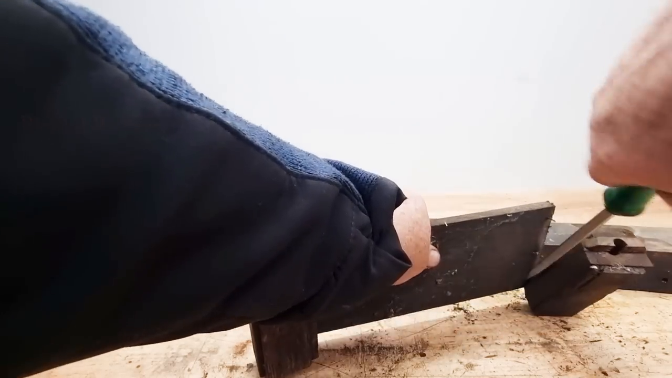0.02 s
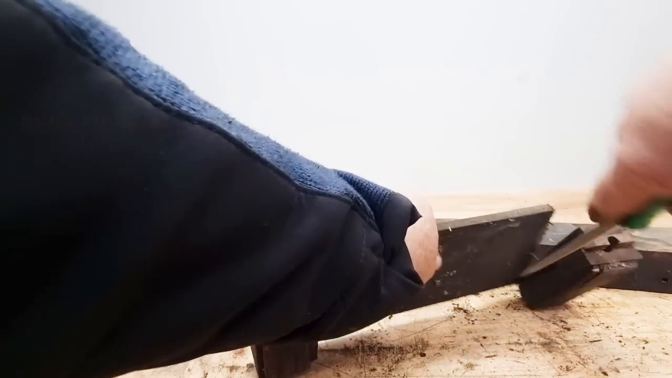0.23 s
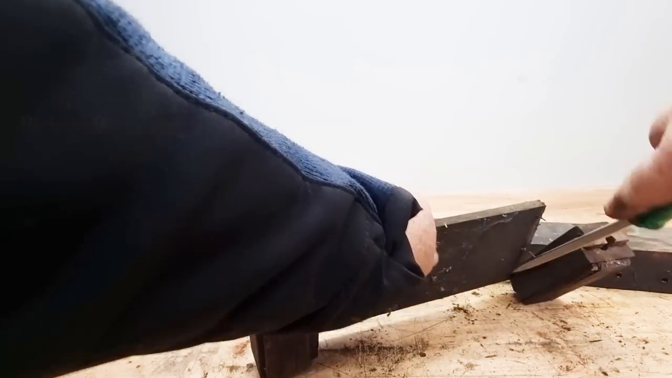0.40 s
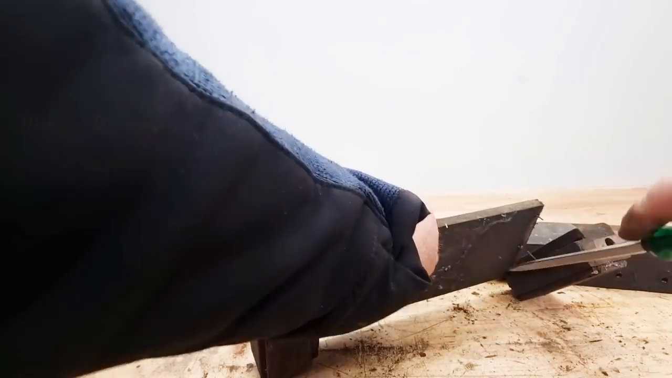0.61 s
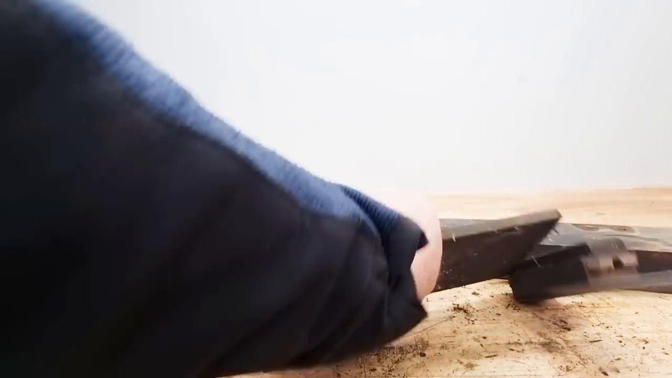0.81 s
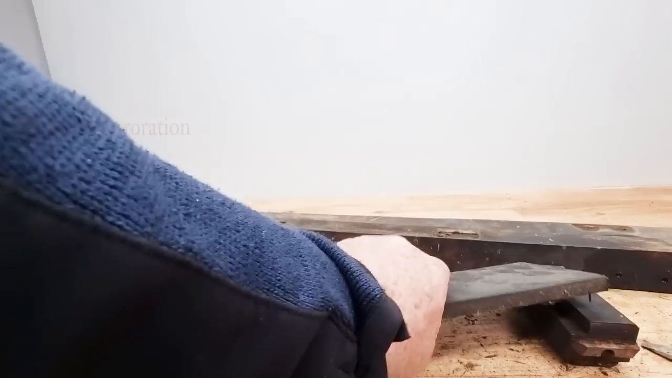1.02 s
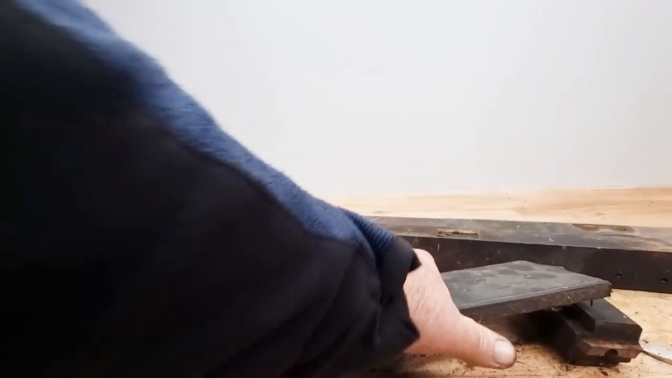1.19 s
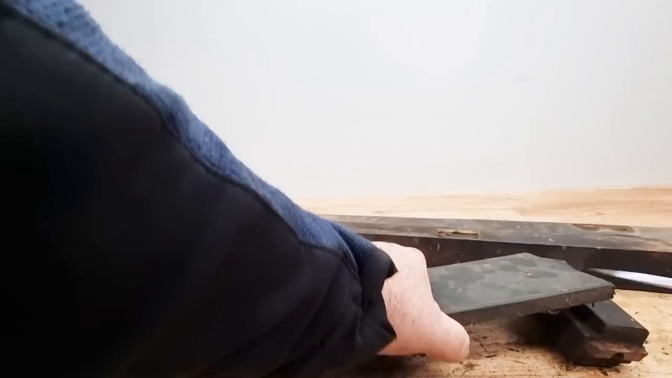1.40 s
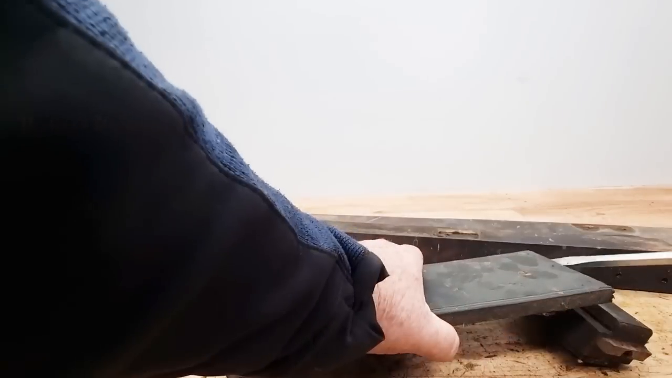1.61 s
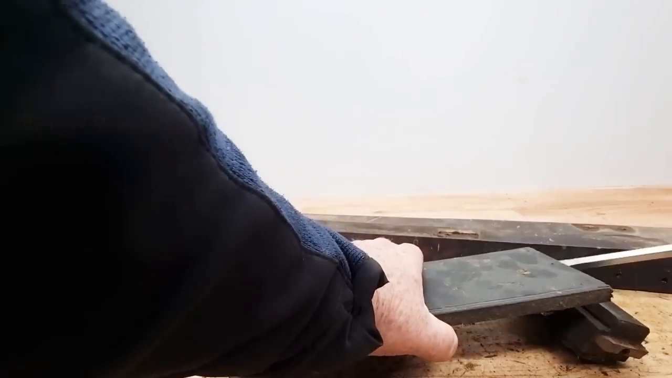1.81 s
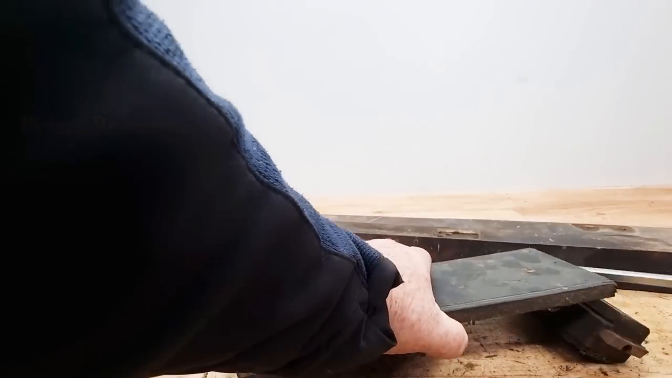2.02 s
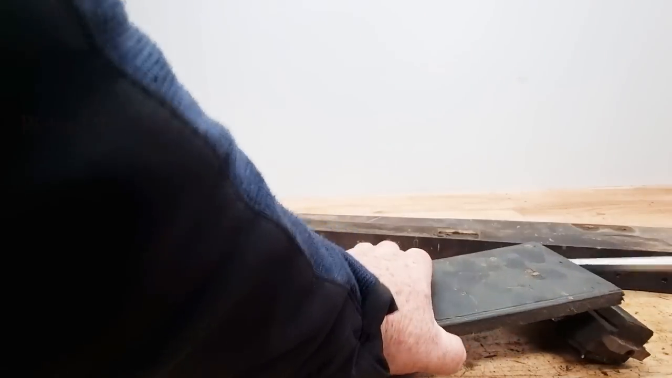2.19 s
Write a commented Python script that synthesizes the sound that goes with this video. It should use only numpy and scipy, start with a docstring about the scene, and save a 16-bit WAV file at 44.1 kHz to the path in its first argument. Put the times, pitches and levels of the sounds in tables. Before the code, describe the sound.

Dry wood knocks and thuds on a bench, with small prying cracks, brief scrapes and light ticks

```python
"""A faint hum and soft room noise come first, then small cracks as a screwdriver prises an old painted
joint apart on a workbench. Cracks are runs of tiny clicks, and sliding is a bed of fine, coloured grains.
Knocking blocks, bench thuds and shaft ticks are sums of fading tones; a brief squeak is a few pure tones.
A small hard workshop answers with an echo tail made of fading noise."""
import sys
import numpy as np
from scipy import signal
from scipy.fft import rfft, irfft, next_fast_len
from scipy.io import wavfile

SR = 44100
rng = np.random.default_rng(int(sys.argv[2]) if len(sys.argv) > 2 else 0)


def store_wav(level_fs):
    """Save 16-bit WAV to argv[1]."""
    pcm = np.round(np.clip(np.atleast_2d(level_fs), -1, 1) * 32767)
    wavfile.write(sys.argv[1], SR, pcm.T.astype(np.int16))


def volts_from_db(level):
    """Convert decibel levels to linear amplitude ratios."""
    exponent = np.asarray(level, float) / 20
    return 10 ** exponent


N = 97020  # samples, 2.2 s

# room noise as heard at the end of the whole chain, nearly empty at the very top:
# pitch_hz, relative_level_db
AIR_AS_HEARD = [(12, -58), (20, -24.5), (97, -6), (123, -10.5), (199, -2), (221, -11), (387, -14),
                (492, -6), (548, -14.5), (1190, -13), (1730, -20.5), (2510, -23.5), (2790, -29),
                (3950, -42), (11800, -49), (15300, -75), (22000, -120)]
# loudness of the room noise over time, before the lift below: time_s, level_db
AIR_LOUDNESS = [(0.0, -60), (0.59, -62), (0.76, -60.5), (1.09, -58), (1.28, -61.5), (2.2, -63.5)]
# how alike the room noise is at left and right: pitch_hz, likeness (1 same, 0 unrelated, -1 opposite)
AIR_LIKENESS = [(60, 1.0), (180, 1.0), (550, 0.99), (1650, 0.99), (4970, 0.55), (15000, -0.62)]
AIR_LIFT_DB = 3.5
HUM_HZ, HUM_WIDTH_HZ, HUM_DB = 95, 7, -66

# time for the workshop's echo tail to fade by 60 dB: pitch_hz, fade_s
ROOM_FADE = [(150, 0.14), (500, 0.34), (1500, 0.2), (4000, 0.32), (9000, 0.31), (15000, 0.12)]
# how alike the tail is at left and right: pitch_hz, likeness
ROOM_LIKENESS = [(300, 0.96), (800, 0.83), (2000, 1), (5000, 0.2), (12000, 0.13)]
# level of each source sent to the room
CRACK_WET_DB, BENCH_WET_DB, BLOCK_WET_DB, SLIDE_WET_DB, TICK_WET_DB = -2.5, -4, -4, -4, -11
LOW_CUT_HZ = 130

# strokes of wood and tip sliding, one list per stroke: time_s, pressure_db
SLIDE_STROKES = [
    [(0.46, -86), (0.488, -63.5), (0.502, -67), (0.526, -65), (0.54, -62.5), (0.556, -89), (0.62, -95)],
    [(0.72, -84), (0.772, -79), (0.798, -69), (0.814, -73), (0.828, -59.5), (0.896, -73.5), (0.904, -64.5),
     (0.962, -70), (0.972, -82), (1.024, -77), (1.1, -73)],
    [(1.24, -71), (1.274, -72.5), (1.298, -74), (1.388, -76), (1.42, -100), (1.46, -69.5), (1.52, -81)],
]
# colour of the sliding grains: pitch_hz, relative_level_db
SLIDE_COLOUR = [(880, -36), (1500, -11), (2300, -7.5), (2720, -10), (3150, -15), (3450, -13), (5880, -19.5),
                (7320, -19), (8570, -24), (13800, -28), (16000, -35)]
GRAINS_PER_S, GRAIN_SPREAD_DB = 6000, 2.5

# tones of the squeak as the tip slips in the joint: pitch_hz, level_db
SQUEAK_TONES = [(2600, -47.5), (3750, -56.5), (5300, -65)]
SQUEAK_START_S, SQUEAK_LENGTH_S = 0.537, 0.0098

# the shaft ticking on wood: start_s, peak_db, favoured_pitch_hz, width_octaves, chatter_fade_s
SHAFT_TICKS = [(0.698, -40, 2220, 0.32, 0.0098), (1.461, -52, 3700, 0.75, 0.0073),
               (1.704, -69, 4350, 0.065, 0.0082), (1.7357, -46, 2870, 0.99, 0.0031),
               (1.7399, -42.5, 2730, 1, 0.0022)]
# tones of the steel shaft, fade times capped below: pitch_hz, relative_level_db, fade_by_60_db_s
STEEL_TONES = [(2100, 4, 0.033), (2283, 7.5, 0.073), (2573, 7, 0.026), (3735, -6, 0.033),
               (4350, -1.5, 0.025), (4890, -11.5, 0.028), (7040, -11, 0.071)]
LONGEST_STEEL_FADE_S, TICK_CONTACT_S = 0.032, 0.0013

# soft thuds into the bench top: start_s, peak_db, tilt_db_per_octave (above 240 Hz), contact_s,
# share_of_free_fade (how much of the free ringing time is left under the hands)
BENCH_THUDS = [(0.239, -32, 5.5, 0.0055, 0.81), (0.264, -31, 5, 0.0039, 0.39),
               (0.289, -44, 21, 0.0065, 0.78), (0.471, -40, -10, 0.0054, 0.17),
               (0.482, -33, -23, 0.014, 0.1), (0.51, -39.5, 15, 0.0061, 0.58),
               (0.522, -36.5, 2, 0.006, 0.36), (0.537, -29.5, -1, 0.0041, 0.2),
               (0.66, -39, -5, 0.0038, 0.51), (0.691, -36, 1.5, 0.0038, 0.49), (0.7, -43.5, 5.5, 0.0015, 1),
               (0.784, -42.5, 14, 0.01, 0.36), (0.802, -37, 12, 0.0099, 0.36),
               (0.824, -35, -11.5, 0.0057, 0.87), (0.836, -36, -8, 0.0053, 1),
               (0.866, -37.5, 10, 0.0032, 0.35), (0.905, -26, 5, 0.0036, 0.58),
               (0.915, -32, -1, 0.017, 0.48), (0.946, -31, 2, 0.004, 0.75),
               (0.969, -27, 11.5, 0.0092, 0.53), (0.983, -30.5, -4, 0.017, 0.46),
               (0.999, -38.5, 11, 0.0032, 1), (1.127, -32.5, 9.5, 0.0018, 0.71),
               (1.132, -33.5, 13.5, 0.0013, 1), (1.143, -35.5, 2, 0.0051, 0.92),
               (1.205, -39, 0, 0.015, 0.6), (1.213, -40, 15.5, 0.0045, 0.67), (1.358, -47, 8, 0.01, 0.13),
               (1.455, -47, 8, 0.0099, 0.43), (1.661, -52, 2, 0.0036, 0.25),
               (1.667, -44.5, -14, 0.0063, 0.38), (1.703, -52.5, 18, 0.0075, 0.26),
               (1.717, -44.5, -7, 0.0066, 0.47), (1.743, -48, 3, 0.0029, 0.34),
               (1.759, -45, -6, 0.0063, 0.41), (2.078, -50, -9, 0.0087, 0.76)]
# tones of the bench top ringing freely: pitch_hz, relative_level_db, fade_by_60_db_s
BENCH_TONES = [(193.2, 2.5, 0.2), (228.8, 6, 0.2), (247.8, 0.5, 0.29), (346.1, 1, 0.21),
               (417.4, -5.5, 0.42), (446.4, -0.5, 0.14), (514.4, -2, 0.09), (736, -10, 0.057)]

# loose blocks knocking: start_s, peak_db, favoured_pitch_hz, width_octaves
BLOCK_KNOCKS = [(0.233, -38.5, 1940, 0.76), (0.536, -42.5, 890, 0.92), (.698, -36.5, 1510, 0.95),
                (.9, -23.5, 1467, 0.18), (0.911, -37, 1560, 0.56), (.94, -24, 1414, 0.32),
                (.968, -28.5, 1220, 0.068), (.973, -31.5, 854, 1), (.991, -31.5, 1450, 0.25),
                (1.016, -39, 1290, 0.28), (1.128, -32, 1080, 0.34), (1.195, -27.5, 1436, 0.32),
                (1.209, -35, 1465, 0.3), (1.218, -37.5, 1180, 0.22), (1.45, -45.5, 1534, 0.29)]
# tones of the wooden blocks, fade times capped below: pitch_hz, relative_level_db, fade_by_60_db_s
BLOCK_TONES = [(845, 3, 0.059), (1087, 6, 0.02), (1197, 4.5, 0.024), (1292, 6, 0.018), (1359, 1.5, 0.023),
               (1454, -4, 0.025), (1565, -2.5, 0.025), (1585, -7, 0.017), (1837, 5.5, 0.012),
               (2217, 8.5, 0.011)]
LONGEST_BLOCK_FADE_S, KNOCK_CONTACT_S = 0.035, 0.0024

# paint and wood fibres cracking: start_s, level_db (before scaling), fade_s (to about a third),
# favoured_pitch_hz, width_octaves
FIBRE_CRACKS = [(0.062, -37.5, 0.006, 7000, 1.34), (0.067, -45, 0.0093, 7000, 0.63),
                (0.2317, -39, 0.035, 7050, 3.7), (.232, -35, 0.038, 1370, 1.23),
                (0.699, -41, 0.0045, 2400, 0.89), (0.824, -56, 0.039, 7020, 0.16),
                (0.9, -39, 0.0092, 2600, 0.67), (0.936, -48.5, 0.031, 2630, 0.28),
                (0.971, -50.5, 0.0089, 3880, 1.14), (0.987, -44.5, 0.0095, 2660, 0.35),
                (1.127, -55.5, 0.01, 2930, 0.76), (1.21, -59.5, 0.0097, 3200, 0.34),
                (1.272, -68, 0.009, 4830, 0.25), (1.449, -55.5, 0.028, 2200, 0.52),
                (1.654, -65, 0.014, 3340, 0.57), (1.738, -58.5, 0.0094, 5700, 0.89)]
SNAPS_PER_S, SNAP_SPREAD_DB = 3500, 3.5
FIRST_SNAP = 1.9  # size of the opening snap over the rms of the run

# level difference between the two ports: pitch_hz, left_minus_right_db
PORT_LEVELS = [(400, 0), (1000, -.2), (1650, -1.5), (3000, -4.5), (5000, -8), (15000, -9)]
# phase by which left leads, before it is eased off in the low end: pitch_hz, lead_radians
PORT_LEAD = [(2500, 1.1), (5000, 0.72), (9000, 1.03), (14000, 2)]
PORTS_HZ = 1500  # well below this the ports are nearly in phase


def unit(x):
    """Scale a sound to an rms of 1."""
    return x / np.sqrt(np.mean(x ** 2) + 1e-20)


def along(points, hz):
    """Read a value between (pitch, value) points on a log pitch axis."""
    point_hz, value = np.transpose(points)
    return np.interp(np.log(hz + 1), np.log(point_hz + 1), value)


def filtered(x, response):
    """Shape a sound by a response that depends on frequency."""
    length = next_fast_len(N + 8192)
    spectrum = rfft(x, length) * response(np.fft.rfftfreq(length, 1 / SR))
    return irfft(spectrum, length)[..., :N]


def spread(pair, likeness):
    """Blend two unrelated signals into a left and right of a given likeness."""
    def shares(hz):
        angle = np.arccos(np.clip(along(likeness, hz), -1, 1)) / 2
        return np.sqrt(2) * np.array([np.cos(angle), np.sin(angle)])

    mid, side = filtered(pair, shares)
    return np.array([mid + side, mid - side]) / np.sqrt(2)


def add(track, start_s, sound):
    """Mix a sound into a track at its start time."""
    part = track[round(start_s * SR):][:len(sound)]
    part += sound[:len(part)]


def focus(hz, centre_hz, octaves):
    """Favour tones near the struck place's pitch: 6 dB down at the given width in octaves."""
    return -6 * (np.log2(hz / centre_hz) / octaves) ** 2


def ring(hz, level_db, fade_s, contact_s, scatter_db):
    """A struck object as fading tones under a soft start; longer contact starts softer. Peak 1."""
    t = np.arange(SR // 3)[:, None] / SR
    uneven_db = level_db + scatter_db * rng.standard_normal(len(hz))
    tones = volts_from_db(uneven_db - 60 * t / fade_s) * np.sin(2 * np.pi * hz * t)
    soft_start = np.sin(np.pi / 2 * np.minimum(t[:, 0] / contact_s, 1)) ** 2
    x = tones.sum(1) * soft_start
    return x / np.abs(x).max()


def grains(per_s, spread_db):
    """Sparse clicks of random sign and uneven size, rms 1."""
    chance, sign, size = rng.random((3, N))
    clicks = (chance < per_s / SR) * np.sign(sign - 0.5)
    return unit(clicks * volts_from_db(-spread_db * np.log(size + 0.0014)))


def air():
    """Room noise is shaped random noise; the wavering hum is a narrow band of low noise."""
    time_s, level_db = np.transpose(AIR_LOUDNESS)
    shaped = filtered(rng.standard_normal((2, N)), lambda hz: volts_from_db(along(AIR_AS_HEARD, hz)))
    noise = unit(spread(shaped, AIR_LIKENESS))
    loudness = volts_from_db(np.interp(np.arange(N) / SR, time_s, level_db) + AIR_LIFT_DB)
    hum = filtered(rng.standard_normal(N), lambda hz: np.exp(-((hz - HUM_HZ) / HUM_WIDTH_HZ) ** 2))
    return noise * loudness + volts_from_db(HUM_DB) * unit(hum)


def room(x):
    """The walls' tail is fading noise, drawn anew for every short, cross-faded stretch."""
    out, step, delay = np.zeros((2, N)), 2205, 180  # samples: 50 ms and 4 ms
    fade = np.sin(np.pi * np.arange(2 * step) / (2 * step)) ** 2
    for k in range(0, N, step):
        hz, t, noise = signal.stft(rng.standard_normal((2, SR // 2)), SR, nperseg=256)
        fading = noise * volts_from_db(-60 * t / along(ROOM_FADE, hz)[:, None])
        tail = signal.istft(fading, SR, nperseg=256)[1]
        tail = tail / np.linalg.norm(tail[0])
        piece = x[k:k + 2 * step]
        piece = piece * fade[:len(piece)]
        echo = signal.fftconvolve(piece[None], tail, axes=1)
        part = out[:, k + delay:][:, :echo.shape[1]]
        part += echo[:, :part.shape[1]]
    return spread(out, ROOM_LIKENESS)


def slide():
    """Fine grains of flaking paint under the moving pieces, louder with pressure."""
    clicks = grains(GRAINS_PER_S, GRAIN_SPREAD_DB)
    rasp = unit(filtered(clicks, lambda hz: volts_from_db(along(SLIDE_COLOUR, hz))))
    t, pressure = np.arange(N) / SR, np.zeros(N)
    for stroke in SLIDE_STROKES:
        time_s, level_db = np.transpose(stroke)
        pressure += volts_from_db(np.interp(t, time_s, level_db, -140, -140))
    return rasp * pressure


def squeak():
    """The tip slips in the joint and squeaks: a few pure tones under one short swell."""
    out, (hz, level_db) = np.zeros(N), np.transpose(SQUEAK_TONES)
    t = np.arange(round(SQUEAK_LENGTH_S * SR))[:, None] / SR
    swell = np.sin(np.pi * t / SQUEAK_LENGTH_S)
    tones = volts_from_db(level_db) * np.sin(2 * np.pi * hz * t)
    add(out, SQUEAK_START_S, (tones * swell).sum(1))
    return out


def ticks():
    """The held shaft chatters briefly on the wood, and each contact rings its steel tones."""
    out, (hz, level_db, fade_s) = np.zeros(N), np.transpose(STEEL_TONES)
    t = np.arange(SR // 30) / SR
    fade_s = np.minimum(fade_s, LONGEST_STEEL_FADE_S)
    for start_s, peak_db, centre_hz, octaves, chatter_s in SHAFT_TICKS:
        # one clean hit, then weaker random contacts dying away
        chatter = (t == 0) + 0.16 * rng.standard_normal(len(t)) * np.exp(-t / chatter_s)
        tones_db = level_db + focus(hz, centre_hz, octaves)
        x = signal.fftconvolve(chatter, ring(hz, tones_db, fade_s, TICK_CONTACT_S, scatter_db=0.5))
        add(out, start_s, volts_from_db(peak_db) * x / np.abs(x).max())
    return out


def thuds():
    """Soft pushes ring the bench top, damped by the hands."""
    out, (hz, level_db, fade_s) = np.zeros(N), np.transpose(BENCH_TONES)
    octaves_up = np.maximum(np.log2(hz / 240), 0)
    for start_s, peak_db, tilt, contact_s, free in BENCH_THUDS:
        x = ring(hz, level_db + tilt * octaves_up, free * fade_s, contact_s, scatter_db=2)
        add(out, start_s, volts_from_db(peak_db) * x)
    return out


def knocks():
    """Hard contacts ring the loose wooden blocks."""
    out, (hz, level_db, fade_s) = np.zeros(N), np.transpose(BLOCK_TONES)
    fade_s = np.minimum(fade_s, LONGEST_BLOCK_FADE_S)
    for start_s, peak_db, centre_hz, octaves in BLOCK_KNOCKS:
        tones_db = level_db + focus(hz, centre_hz, octaves)
        x = ring(hz, tones_db, fade_s, KNOCK_CONTACT_S, scatter_db=0.5)
        add(out, start_s, volts_from_db(peak_db) * x)
    return out


def cracks():
    """An opening snap and a dense, fading run of snaps as the material lets go."""
    out, t = np.zeros(N), np.arange(N) / SR
    for start_s, level_db, fade_s, centre_hz, octaves in FIBRE_CRACKS:
        def colour(x):
            return filtered(x, lambda hz: volts_from_db(focus(hz + 1, centre_hz, octaves)))

        snaps = grains(SNAPS_PER_S, SNAP_SPREAD_DB)
        size = np.std(colour(snaps))  # levels the run whatever its colour
        snaps[round(start_s * SR)] = FIRST_SNAP
        fading = (t >= start_s - 1 / SR) * np.exp(-np.abs(t - start_s) / fade_s)
        out += volts_from_db(level_db - 7.5) / size * colour(snaps * fading)
    return out


def scene():
    """Mix the sources with their echo, cut the lows, and lay the room noise and hum under them."""
    layers = [(slide(), SLIDE_WET_DB), (ticks() + squeak(), TICK_WET_DB), (thuds(), BENCH_WET_DB),
              (knocks(), BLOCK_WET_DB), (cracks(), CRACK_WET_DB)]
    direct = sum(x for x, _ in layers)
    echo = room(sum(x * volts_from_db(wet_db) for x, wet_db in layers))
    low_cut = signal.butter(4, LOW_CUT_HZ, "high", fs=SR, output="sos")
    return signal.sosfilt(low_cut, direct + echo) + air()


def band_limit(x):
    """A steep low-pass at the top of the band."""
    return signal.sosfilt(signal.butter(12, 16490, fs=SR, output="sos"), x)


def record(dry):
    """Two ports pick up the scene with different treble level and phase."""
    ports = np.array([[0.5], [-0.5]])  # each takes half of the difference

    def response(hz):
        level = volts_from_db(along(PORT_LEVELS, hz) * ports)
        lead = along(PORT_LEAD, hz) * hz ** 2 / (hz ** 2 + PORTS_HZ ** 2)
        return level * np.exp(1j * lead * ports)

    mix = filtered(dry, response)
    return band_limit(mix)


dry = scene()
out = record(dry)
store_wav(out)
```